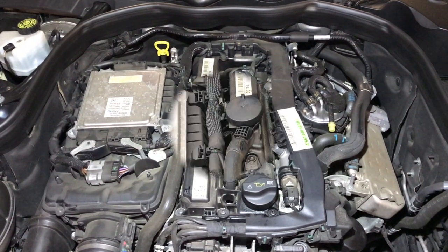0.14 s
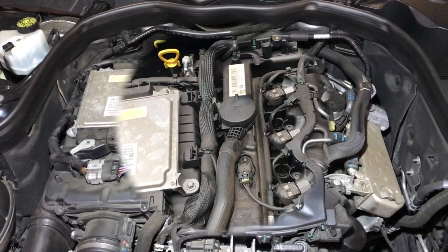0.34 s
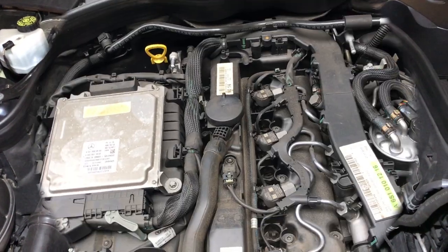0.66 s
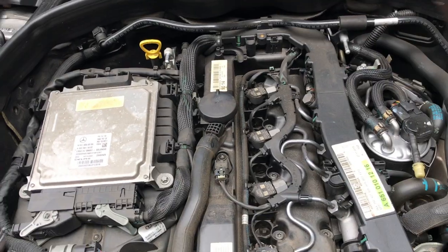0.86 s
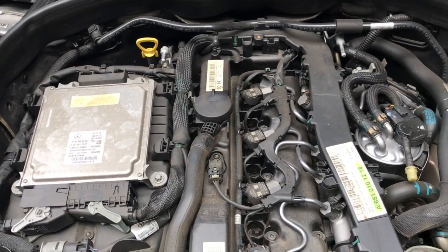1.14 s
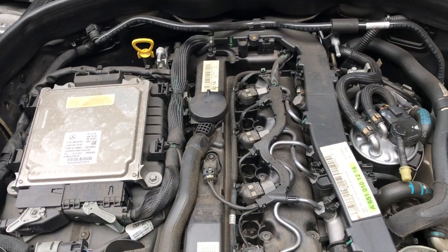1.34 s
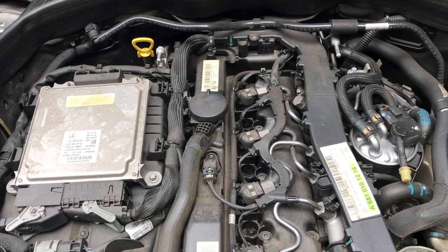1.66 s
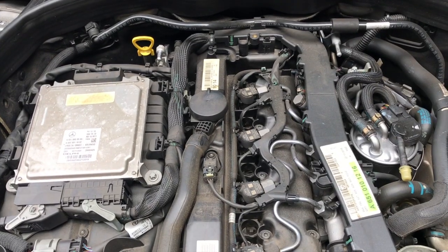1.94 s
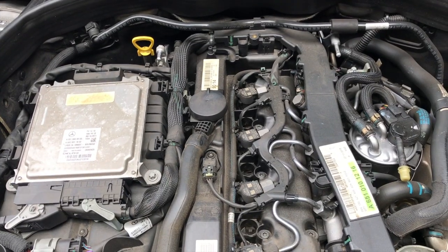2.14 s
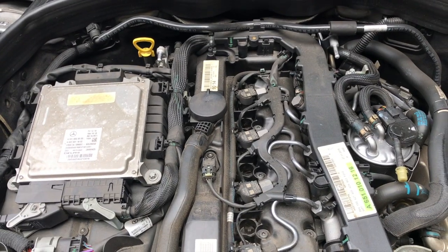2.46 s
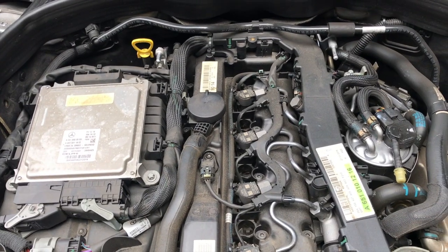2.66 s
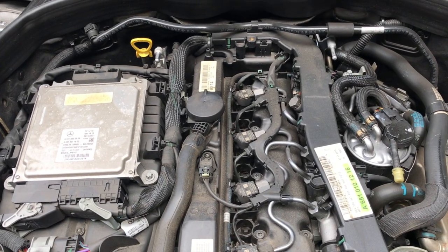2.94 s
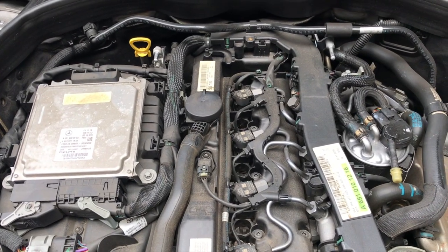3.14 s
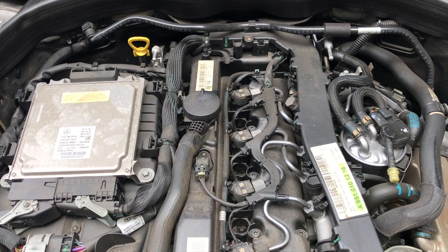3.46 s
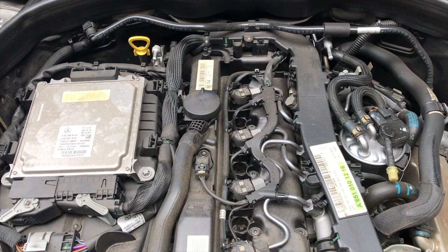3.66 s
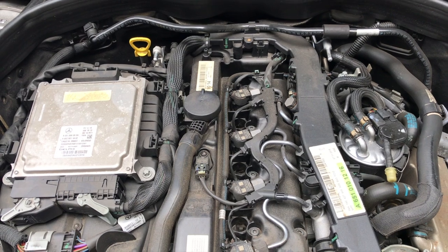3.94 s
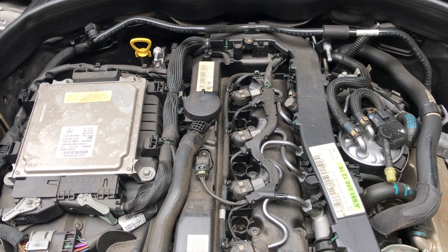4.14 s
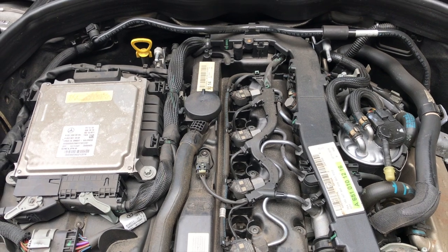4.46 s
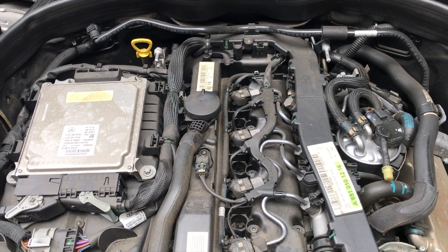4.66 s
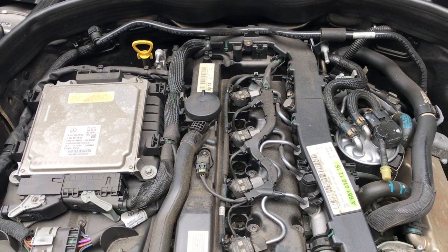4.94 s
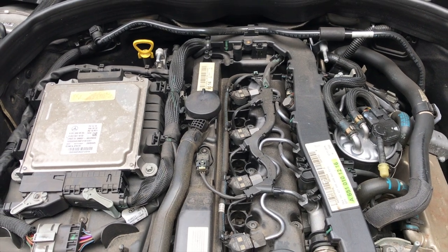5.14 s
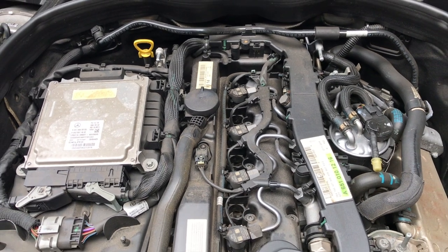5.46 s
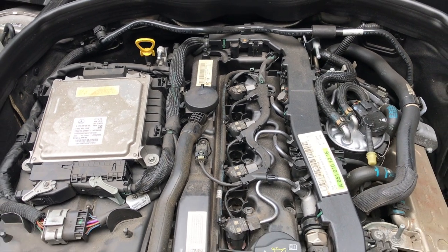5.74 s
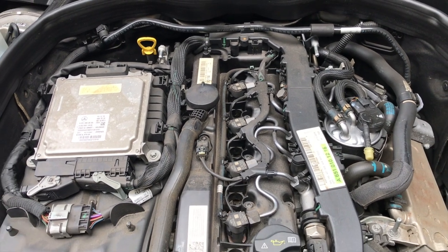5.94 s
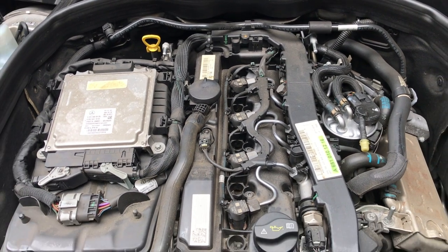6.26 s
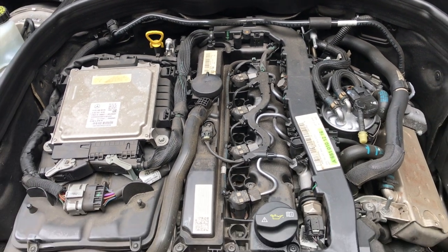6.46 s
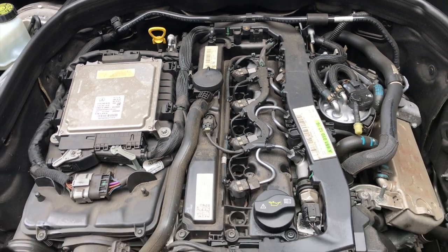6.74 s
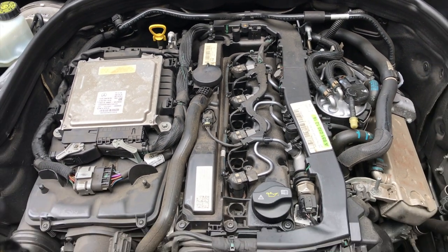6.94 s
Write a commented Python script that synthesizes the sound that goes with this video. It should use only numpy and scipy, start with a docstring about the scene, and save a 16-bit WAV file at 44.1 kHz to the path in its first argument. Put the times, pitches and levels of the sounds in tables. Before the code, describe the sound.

Relays tick, a starter whirrs and clanks, a cold diesel catches with a harsh metallic chain rattle, then settles to a throbbing, knocking idle.

```python
"""Over an open engine bay, microphone just above a cold four-cylinder diesel: relays tick, the starter cranks,
the engine catches. A slack timing chain rattles hard at every firing for nearly four seconds, until oil
pressure tightens it; then a deep throb, diesel clatter and stray knocks remain. Metal contacts are noise bursts
and damped rings, timed by the crank and coloured by resonances; the throb is a sum of firing orders.
The loud blows overload the microphone."""
import sys
import numpy as np
from scipy import signal
from scipy.fft import rfft, irfft
from scipy.io import wavfile
from scipy.ndimage import map_coordinates

SR = 44100
rng = np.random.default_rng(int(sys.argv[2]) if len(sys.argv) > 2 else 0)


def dump_mix(stems):
    """Bounce the given channels to the path in sys.argv[1] as a 16-bit WAV at rate SR."""
    frames = np.atleast_2d(stems).T  # one column per channel
    limited = np.clip(frames, -1, 1)  # hard clip at full scale
    pcm = np.round(limited * 32767).astype(np.int16)
    wavfile.write(sys.argv[1], SR, pcm)


N = 312917

# Levels in the tables are relative: each source sets its own gain on top.
# harmonics of the firing rate in the throb: firing_multiple, level_db
FIRING_ORDERS = [(1, 1), (2, -9.5), (3, -16), (4, -11.5), (5, -18.5), (6, -13), (7, -15.5), (8, -23.5),
                 (11, -20)]
# contacts within each firing, for chain, injection and valves: cycle_share, level_db
CHAIN_CONTACTS = [(.63, 3.5), (.75, -2.5), (.88, -7), (.11, -1.5), (.33, -2)]
INJECTION_CONTACTS = [(.12, -0.5), (.35, 0), (.62, -1), (.79, 3), (.97, -6)]
VALVE_CONTACTS = [(.25, -1), (.62, 5), (.8, 5)]
# relays and valves before the start: start_s, level_db, body_level_db, pitch_hz
RELAY_TICKS = [(.4324, -50, -1.5, 7500), (.5074, -37.5, -14, 4100), (.5394, -46, 1.5, 3800),
               (0.5866, -32.5, -12, 2450), (0.6007, -26, -29, 6450), (0.6355, -28.5, -19, 4120)]
# loudest hollow knocks: start_s, level_db, pitch_hz
LOUD_KNOCKS = [(5.084, -5.5, 2120), (5.1223, -4.5, 2090), (5.245, -7, 2120), (5.377, -11.5, 2110),
               (5.433, -7.5, 1400), (5.459, -4.5, 2360), (5.5316, 0.5, 2400), (5.6496, -5, 2180),
               (5.882, -9, 2330), (6.0437, -11, 1460), (6.1813, -11, 2210), (6.647, -9.5, 2370),
               (6.693, -9.5, 2050), (6.795, -15, 2230)]
# loudest slaps of the tightening chain: start_s, level_db
LOUD_SLAPS = [(5.0387, -4), (5.1018, -1), (5.1816, -6), (5.2551, -6), (5.3967, -6.5), (5.5057, -9),
              (5.576, -11.5), (6.0077, -13), (6.1888, -10.5), (6.6302, -11), (6.8887, -11)]
# resonances of the chain cover and the block: pitch_hz, width_hz, level_db over the broad colour
COVER_MODES = [(1380, 120, -3), (2300, 160, 6), (3240, 120, -1), (4580, 60, 8), (6094, 23, 6.5),
               (6830, 150, 10), (7220, 650, 4), (11800, 200, 1.5)]
BLOCK_MODES = [(486, 40, 9), (694, 30, 6), (897, 52, 3.2), (1045, 36, 5.3), (1348, 69, 7.8),
               (1600, 45, 3.2), (2410, 180, 3.4), (6020, 180, 7.9), (7240, 230, 9)]
# broad colours of the sources: pitch_hz, level_db
CHAIN_COLOUR = [(100, -26.5), (400, -16.5), (1400, 0), (2300, -0.5), (3000, -4), (5200, -2.5), (7500, -2),
                (8800, -2), (12000, -4), (15800, -15.5)]
CLATTER_COLOUR = [(60, -53), (150, -5.5), (280, -1), (360, -9), (500, -4.5), (1500, 1.5), (2300, -6.5),
                  (3000, -8.5), (5000, -8.5), (7500, -8), (10000, -9.5), (15800, -32)]
VALVE_COLOUR = [(500, -16), (2800, -10), (4000, 6.5), (5000, -3), (7400, 3.5), (9000, -15), (13000, -1.5),
                (15800, -32)]
THUMP_COLOUR = [(20, -19), (70, 1.5), (250, -2.5), (360, -3), (500, -1.5), (1200, -3.5), (3000, -21.5),
                (15000, -51)]
STARTER_COLOUR = [(59, -34), (100, -10.5), (605, -11), (1140, -7), (2780, -12), (3740, -8), (13600, -22),
                  (15800, -47)]
AIR_COLOUR = [(20, -7), (38, -1), (60, -18), (200, -30.5), (320, -36), (1050, -39), (1800, -49.5),
              (7400, -58), (15800, -76)]
SLAP_COLOUR = [(300, 0), (1500, -1), (4000, 2.5), (8000, 6.0), (12500, 0), (15800, -14)]
RELAY_COLOUR = [(1000, -15), (3500, 0), (12000, -10), (15800, -15)]
HISS_COLOUR = [(3000, -19), (5800, -1), (9000, -15), (15800, -28)]
PUFF_COLOUR = [(12, -14), (26, 5.5), (65, -6), (600, -62)]
# ringing spots that the chain strikes at random: pitch_hz, lowest_level_db
CHAIN_SPOTS = [(1400, -3.5), (1700, -2.5), (2250, 3), (3200, -2.5), (4500, -5), (6150, -5.5), (7050, -2)]
# slow drift of the idle: time_s, added_firings_per_s
IDLE_WANDER = [(4, 0), (5.3, .49), (6.7, -.39)]
# first compressions, ever closer together: start_s, clank_level_db, pitch_hz, rebound_level_db
FIRST_COMPRESSIONS = [(.985, -6.5, 1760, -32), (1.135, -9, 7040, -15), (1.224, -13, 6100, -17.5),
                      (1.278, -13, 7000, -20)]
# the two spots that weak knocks ring: pitch_hz
WEAK_KNOCK_PITCHES = [1410, 2280]

# the engine catches, its running noise builds up, the first full firing (s)
CATCH_S, BUILD_S, FIRST_FIRING_S = 1.184, 0.19, 1.266
# idle and the flare above it (firings per second), time to the top of the flare (s)
IDLE_RATE, FLARE_RATE, FLARE_S = 27.557, 4.94, .337
# shortfall at the first firing (firings per second), time constant of the pick-up (s)
SHORT_RATE, PICKUP_S = 4.278, .261
# oil pressure arrives, takes up the chain's slack, the engine settles with this time constant (s)
OIL_S, TIGHTEN_S, SETTLE_S = 4.96, 0.23, 0.25
# throb: start and rise (s), level at idle (dB), loss with speed (dB per extra firing a second)
THROB_S, THROB_RISE_S, THROB_DB, THROB_LOSS_DB = 1.115, 0.21, -22, .9
# orders from the fifth up: lift when cold, gain per extra firing a second, fall once settled (dB)
SHARP_DB, SHARP_GAIN_DB, SHARP_FALL_DB = -1.5, 0.7, 9.5
# combustion clatter: level when cold, fall once settled (dB)
CLATTER_DB, CLATTER_FALL_DB = -18, 10
# valve ticks: level when cold (dB), easing as oil spreads (dB per s), fall once settled (dB)
VALVE_DB, VALVE_EASE_DB_PER_S, VALVE_FALL_DB = -23.5, 1.7, 3.5
# chain rattle ahead of its mix: part that goes with the slack, part that stays (dB)
SLACK_DB, TIGHT_DB = -14, -38
# starter motor: switched on, time to spin up, let go, run-out t60 (s)
STARTER_S, SPIN_UP_S, RELEASE_S, RUN_OUT_S = 0.721, 0.019, 1.26, .3
# its gears: level at switch-on (dB), swell (dB per s)
GEAR_DB, GEAR_SWELL_DB_PER_S = -34.5, 10.5
# gear mesh (Hz), its drop at switch-on (Hz), time constant of the rise (s)
MESH_HZ, MESH_DROP_HZ, MESH_RISE_S = 1323, 300.5, 0.046
# the pinion slams in (s, dB, ring Hz); the flywheel takes the load with a thud (s later, dB)
PINION_S, PINION_DB, PINION_HZ, THUD_DELAY_S, THUD_DB = .744, -16.5, 2330, .025, -19
# each compression thumps the block (dB) and rebounds (s later)
THUMP_DB, REBOUND_S = -21.5, .018
# a tick of gear play announces it: lead (s), level against the clank (dB), ring (Hz)
PLAY_LEAD_S, PLAY_DB, PLAY_HZ = 0.0063, -11, 2400
# puff of air on the microphone: start, rise, t60 (s), level (dB)
PUFF_S, PUFF_RISE_S, PUFF_T60_S, PUFF_DB = 5.36, 0.058, .6, -13
# weak slaps, then weak knocks: chance per firing, top level (dB)
SLAP_CHANCE, SLAP_DB, KNOCK_CHANCE, KNOCK_DB = .3, -10, .2, -11.5
# both fall at one crank angle (share of the cycle) and vary in strength (dB)
STRAY_SHARE, STRAY_SPREAD_DB = .62, 6
# band limit of the recorder
TOP_HZ = 16000


def amp(db):
    """Decibels to gain."""
    return 10 ** (np.asarray(db) / 20)


def unit(x):
    """Scale to rms 1."""
    return x / np.sqrt(np.mean(x ** 2) + 1e-20)


def clock():
    """The time of each sample in seconds."""
    return np.arange(N) / SR


def since(s):
    """Seconds gone by since time s; zero before it."""
    return np.maximum(clock() - s, 0)


def ramp(s, length):
    """Rise from 0 to 1, starting at time s."""
    return np.minimum(since(s) / length, 1)


def envelope(on, attack, off, t60):
    """Attack, hold and release, as a gain."""
    return ramp(on, attack) * amp(-60 * since(off) / t60)


def noise():
    """White noise as long as the scene."""
    return rng.standard_normal(N)


def wobble(rate):
    """A smooth random curve, rate knots a second."""
    knots = rng.standard_normal(int(N * rate / SR) + 4)
    return map_coordinates(knots, [clock() * rate])


def add(track, s, sound):
    """Mix a sound into a track at time s."""
    part = track[max(round(s * SR), 0):][:len(sound)]
    part += sound[:len(part)]


def colour(x, spectrum, modes=(), size=16384):
    """Causal filter of unit energy: a broad colour with resonances standing on it."""
    hz = np.fft.rfftfreq(size, 1 / SR)
    f, db = np.transpose(spectrum)
    peaks = sum(amp(level) ** 2 / (1 + (2 * (hz - centre) / width) ** 2) for centre, width, level in modes)
    gain = amp(np.interp(np.log(hz + 1), np.log(f), db)) * np.sqrt(1 + peaks)
    # folding the cepstrum gives minimum phase, so nothing sounds ahead of the blow
    cepstrum = irfft(np.log(gain + 1e-6))
    cepstrum[1:size // 2] *= 2
    cepstrum[size // 2 + 1:] = 0
    response = irfft(np.exp(rfft(cepstrum)))
    return signal.fftconvolve(x, response / np.linalg.norm(response))[:N]


def burst(t60, size=8192):
    """Dense metal modes struck together: noise that dies away."""
    return rng.standard_normal(size) * amp(-60 * np.arange(size) / SR / t60)


def ping(hz, t60, size=8192):
    """One damped mode with a soft start."""
    t = np.arange(size) / SR
    return np.sin(2 * np.pi * hz * t) * amp(-60 * t / t60) * (1 - np.exp(-t / 0.00079))


def knock(hz):
    """A loose part struck once: a short ring, a hollow body around it and a crack."""
    band = signal.butter(2, [hz * 0.57, hz * 1.37], "bandpass", fs=SR, output="sos")
    hollow = signal.sosfilt(band, burst(t60=0.053))
    crack = burst(t60=0.019)
    return .75 * ping(hz, t60=0.024) + 0.99 * hollow + 0.2 * crack


def speed():
    """Firings per second: the engine picks up, flares and sinks back to a drifting idle."""
    t = since(FIRST_FIRING_S)
    flare = FLARE_RATE * t / FLARE_S * np.exp(1 - t / FLARE_S)
    shortfall = SHORT_RATE * np.exp(-t / PICKUP_S)
    drift = np.interp(clock(), *np.transpose(IDLE_WANDER))
    return IDLE_RATE + flare - shortfall + drift


def firings():
    """Firings counted from the first full one, per sample; negative before it."""
    count = np.cumsum(speed()) / SR
    return count - count[round(FIRST_FIRING_S * SR)]


def settled():
    """0 while the engine runs dry, nearing 1 once oil pressure is up."""
    return 1 - np.exp(-since(OIL_S) / SETTLE_S)


def strays(chance, top_db):
    """Rows (start_s, level_db) of contacts on random firings after the chain has tightened."""
    turn = firings()
    cycles = np.arange(int(turn[-1]))
    pick, weakness = rng.random((len(cycles), 2)).T
    s = np.interp(cycles + STRAY_SHARE, turn, clock())
    rows = np.column_stack([s, top_db - STRAY_SPREAD_DB * weakness])
    return rows[(pick < chance) & (s > OIL_S + TIGHTEN_S)]


def hammer(beat, t60, scatter_db, jitter, bounce, bounce_db, cylinder_db=0, count=3):
    """Contacts tied to the crank angle, each bouncing and ringing its own spot of metal; rms 1."""
    turn = firings()
    cycles = np.arange(np.ceil(turn[0]), turn[-1])
    out = np.zeros(N)
    for share, db in beat:
        s = np.interp(cycles + share, turn, clock(), right=2 * N / SR)
        s = s + jitter * rng.standard_normal(len(cycles))
        scatter = scatter_db * rng.standard_normal(len(cycles))
        # every fourth firing, one cylinder, can differ in force
        force = amp(db + scatter + cylinder_db * (cycles % 4 == 2))
        for k in range(count):
            samples = np.clip(s * SR, 0, N).astype(int)
            hits = np.bincount(samples, force * amp(k * bounce_db), N + 1)[:N]
            out += signal.oaconvolve(hits, burst(t60))[:N]
            s = s + bounce * rng.exponential(size=len(s))
    return unit(out)


def draught():
    """Faint moving air, a brief fading hiss, and one puff that buffets the microphone: coloured noise."""
    air = amp(-40.5 + wobble(5.9)) * colour(noise(), AIR_COLOUR)
    hiss = amp(-49.5 - 60 * since(.022) / 0.13) * colour(noise(), HISS_COLOUR)
    gust = amp(PUFF_DB) * envelope(PUFF_S, PUFF_RISE_S, PUFF_S + PUFF_RISE_S, PUFF_T60_S)
    puff = gust * colour(noise(), PUFF_COLOUR)
    return air + hiss + puff


def relays():
    """Small clicks, each ringing its own plastic housing."""
    clicks, bodies = np.zeros((2, N))
    for s, db, body_db, hz in RELAY_TICKS:
        add(clicks, s, amp(db - 13) * burst(t60=0.077) + amp(db - 10) * ping(hz, t60=0.033))
        add(bodies, s, amp(db + body_db - 1.0) * burst(t60=0.11))
    return colour(clicks, RELAY_COLOUR) + colour(bodies, CLATTER_COLOUR)


def starter_gears():
    """The motor's gears whirr as rough noise and whine at the harmonics of their mesh."""
    t = since(STARTER_S)
    swell = amp(GEAR_DB + GEAR_SWELL_DB_PER_S * t)
    level = swell * envelope(STARTER_S, SPIN_UP_S, RELEASE_S, RUN_OUT_S)
    mesh_hz = MESH_HZ - MESH_DROP_HZ * np.exp(-t / MESH_RISE_S)
    mesh = 2 * np.pi * np.cumsum(mesh_hz * (1 + .016 * wobble(120))) / SR
    whine = unit(sum(np.sin(k * mesh) for k in range(1, 7)))
    rough = unit(noise() * amp(2.9 * wobble(300)))
    whirr = colour(rough, STARTER_COLOUR, BLOCK_MODES)
    return level * (whirr + amp(-8) * whine)


def starter():
    """Over the gears, the pinion slams in and the first compressions clank and rebound."""
    gears = starter_gears()
    clanks, thumps, rings = np.zeros((3, N))
    add(clanks, PINION_S, amp(PINION_DB) * burst(t60=.15))
    add(rings, PINION_S, amp(PINION_DB + 5.5) * ping(PINION_HZ, t60=.023))
    add(thumps, PINION_S + THUD_DELAY_S, amp(THUD_DB) * burst(t60=.18))
    for s, db, hz, rebound_db in FIRST_COMPRESSIONS:
        add(rings, s - PLAY_LEAD_S, amp(db + PLAY_DB) * knock(PLAY_HZ))
        add(clanks, s, amp(db) * burst(t60=0.064))
        add(rings, s, amp(db + 6.5) * ping(hz, t60=0.019))
        add(thumps, s, amp(THUMP_DB) * burst(t60=.055))
        add(clanks, s + REBOUND_S, amp(rebound_db) * burst(t60=0.11))
        add(thumps, s + REBOUND_S, amp(rebound_db - 4) * burst(t60=.11))
    clank = colour(clanks, CHAIN_COLOUR, COVER_MODES)
    thump = colour(thumps, THUMP_COLOUR, BLOCK_MODES)
    return gears + clank + thump + rings


def valve_train():
    """Valves and injectors tick as long as the engine runs."""
    ticks = hammer(VALVE_CONTACTS, t60=0.092, scatter_db=7.0, jitter=0.00074,
                   bounce=.0025, bounce_db=1, cylinder_db=-1.0, count=2)
    running_db = VALVE_DB - VALVE_EASE_DB_PER_S * since(CATCH_S) - VALVE_FALL_DB * settled()
    return ramp(CATCH_S, BUILD_S) * amp(running_db) * colour(ticks, VALVE_COLOUR, BLOCK_MODES)


def knocks():
    """Hollow knocks stand out of the clatter, with weaker ones between."""
    out = np.zeros(N)
    for s, db, hz in LOUD_KNOCKS:
        add(out, s, amp(db + 3.0) * knock(hz))
    for s, db in strays(KNOCK_CHANCE, KNOCK_DB):
        add(out, s, amp(db) * knock(rng.choice(WEAK_KNOCK_PITCHES)))
    return out


def chain_rattle():
    """The slack chain whips its guides at every firing and strikes ringing spots between, until it tightens."""
    links = hammer(CHAIN_CONTACTS, t60=.04, scatter_db=2, jitter=.0005, bounce=.0018, bounce_db=-1.5)
    whip = colour(links, CHAIN_COLOUR, COVER_MODES)
    strikes = np.zeros(N)
    for hz, db in CHAIN_SPOTS:
        for when, force, detune in rng.random((100, 3)):
            struck = knock(hz * (1 + .12 * (detune - .5)))
            add(strikes, when * N / SR, amp(db + 12 * force) * struck)
    # the strikes come in flurries
    flurries = unit(strikes * amp(wobble(10)))
    slack = 1 - ramp(OIL_S, TIGHTEN_S)
    level = ramp(FIRST_FIRING_S, 0.045) * (amp(SLACK_DB) * slack + amp(TIGHT_DB))
    return level * (amp(-0.3) * whip + amp(-4.5) * flurries)


def chain_slaps():
    """Once oil arrives the chain slaps only now and then, each slap a double blow."""
    slaps = np.zeros(N)
    for s, db in [*LOUD_SLAPS, *strays(SLAP_CHANCE, SLAP_DB)]:
        add(slaps, s, amp(db - 6.5) * burst(t60=0.035))
        add(slaps, s + .0025, amp(db - 8.5) * burst(t60=0.053))
    return colour(slaps, SLAP_COLOUR)


def combustion():
    """Injection knocks ring the block; the mounts rumble around each firing."""
    load_db = CLATTER_DB - CLATTER_FALL_DB * settled()
    blows = hammer(INJECTION_CONTACTS, t60=.04, scatter_db=2.2, jitter=.0004, bounce=.0015, bounce_db=-4, count=2)
    clatter = colour(blows, CLATTER_COLOUR, BLOCK_MODES)
    shake = amp(4 * np.cos(2 * np.pi * firings()))
    rumble = unit(colour(noise(), THUMP_COLOUR) * shake)
    # the rumble eases less than the knock when the load falls
    rumble_db = 0.52 * load_db - 21.0
    return ramp(CATCH_S, BUILD_S) * (amp(load_db) * clatter + amp(rumble_db) * rumble)


def throb():
    """Each firing pushes out a peaked pressure pulse: thinner and sharper at speed, rounder once settled."""
    extra = np.maximum(speed() - IDLE_RATE, 0)
    level = amp(THROB_DB - THROB_LOSS_DB * extra) * ramp(THROB_S, THROB_RISE_S)
    sharp_db = SHARP_DB + SHARP_GAIN_DB * extra - SHARP_FALL_DB * settled()
    turn = firings() + .004 * wobble(20)
    pulse = np.zeros(N)
    for order, db in FIRING_ORDERS:
        k = round(order)
        order_db = db + sharp_db * (k > 4) + 0.78 * wobble(10)
        pulse += amp(order_db) * np.cos(2 * np.pi * k * turn)
    return np.sqrt(2) * level * pulse


def scene():
    """The engine's metal with its short echo under the bonnet, the throb and the air around."""
    engine = combustion() + valve_train()
    chain = chain_rattle() + chain_slaps()
    metal = engine + chain + knocks() + starter() + relays()
    tail = burst(t60=0.22)
    echo = signal.fftconvolve(metal, tail / np.linalg.norm(tail))[:N]
    return (metal + amp(-10.0) * echo + throb() + draught())[None]


def record(dry):
    """The overloaded microphone flattens the loudest peaks; the recorder filters off what lies above its band."""
    ceiling, hardness = .54, 6
    clipped = dry / (1 + np.abs(dry / ceiling) ** hardness) ** (1 / hardness)
    low_pass = signal.firwin(401, TOP_HZ, window="blackman", fs=SR)
    return signal.fftconvolve(clipped, low_pass[None], mode="same", axes=1)


dry = scene()
out = record(dry)
dump_mix(out)
```